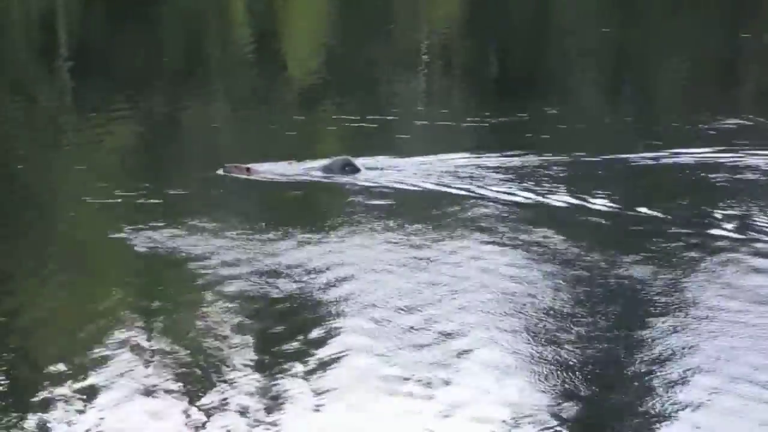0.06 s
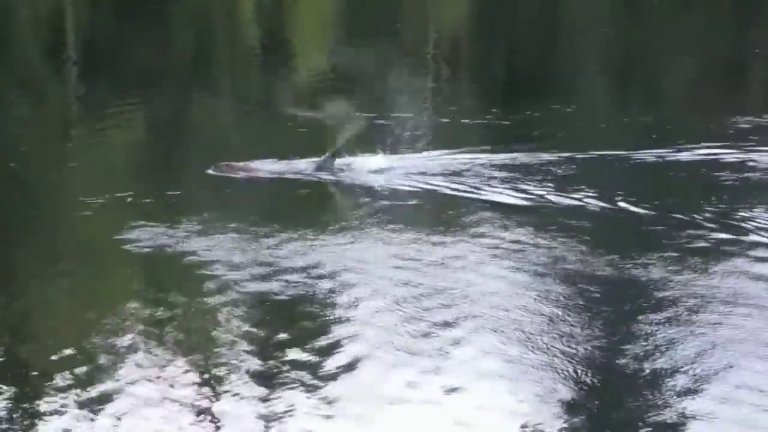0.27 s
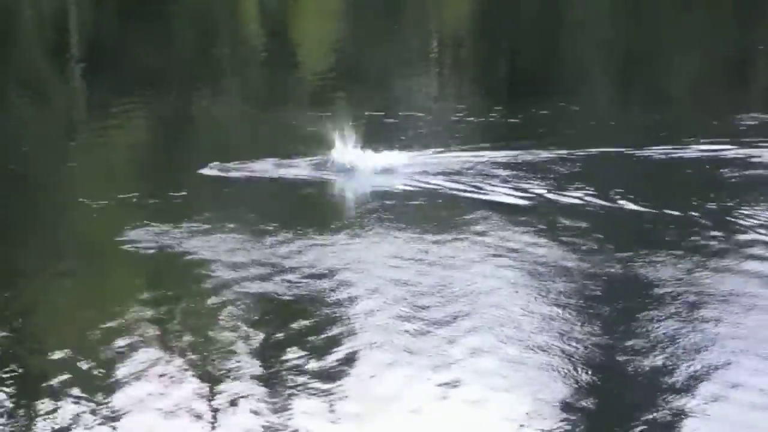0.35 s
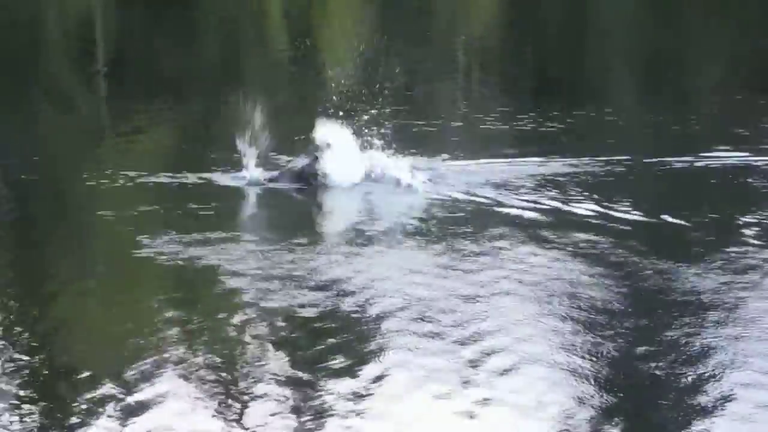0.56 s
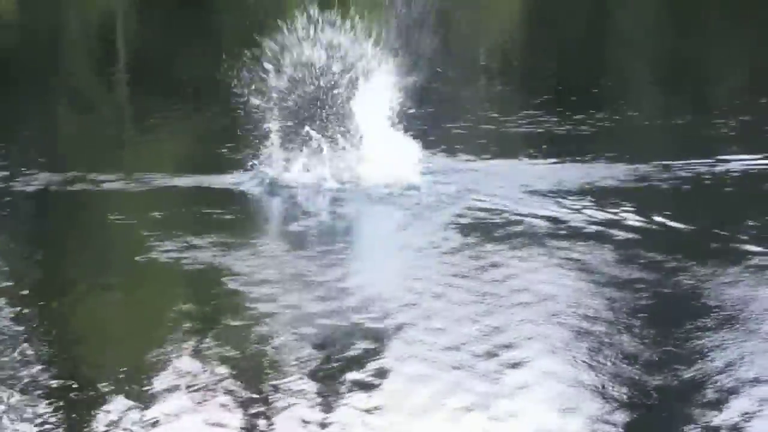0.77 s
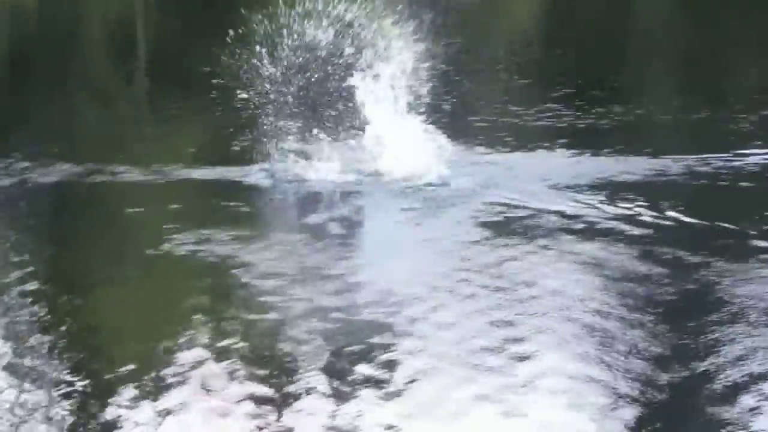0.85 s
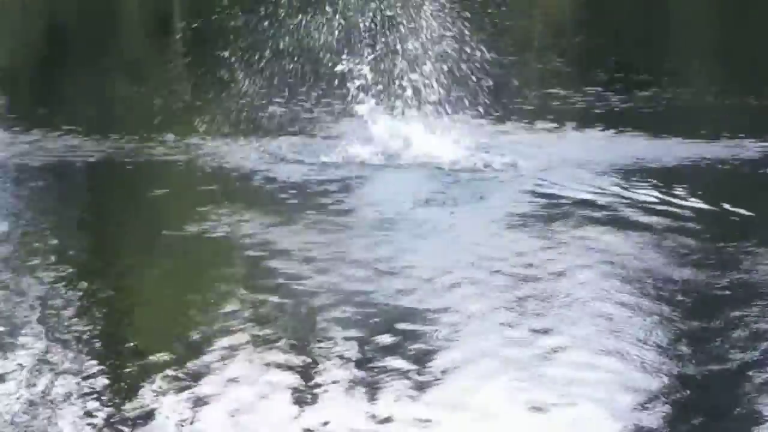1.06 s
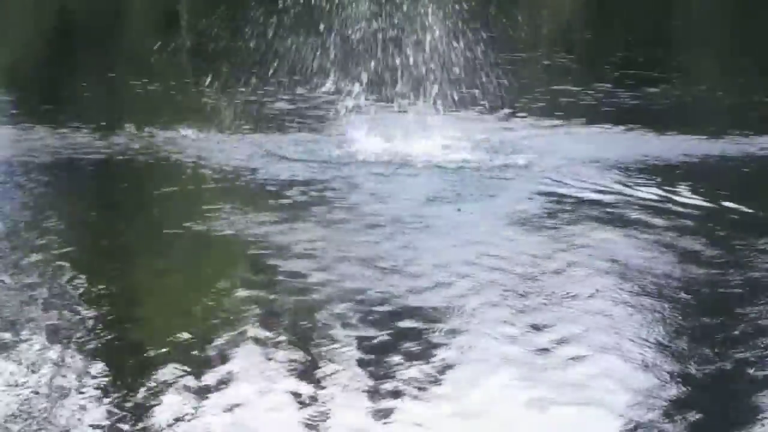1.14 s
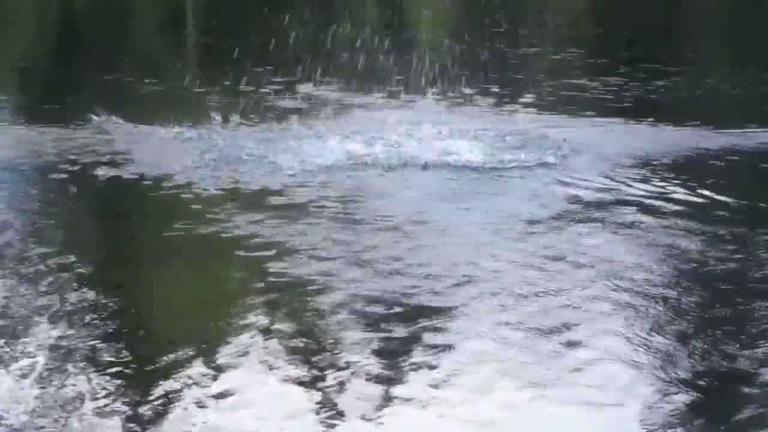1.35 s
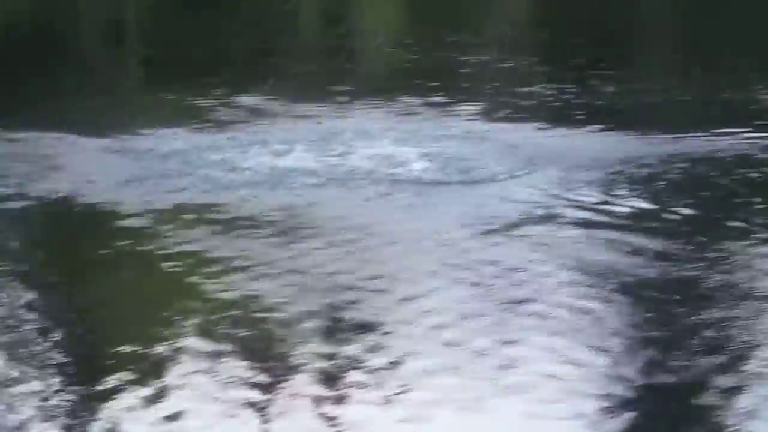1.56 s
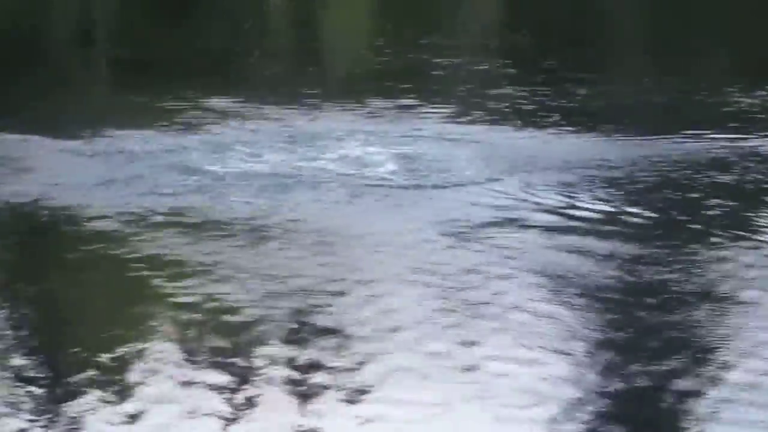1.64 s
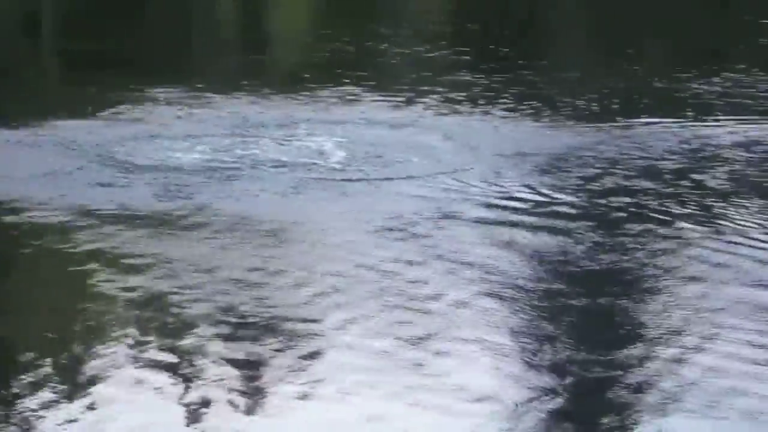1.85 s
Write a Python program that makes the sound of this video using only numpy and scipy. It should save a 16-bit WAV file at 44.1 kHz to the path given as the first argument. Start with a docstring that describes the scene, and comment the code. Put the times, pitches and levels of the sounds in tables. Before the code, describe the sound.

A beaver's tail slaps a pond. A small watery swish at 0.2 seconds leads to the sharp, loud crack and low thump at 0.4, with a faint echo from the bank. A deep plunk follows at 0.65 as spray bursts up and water gurgles. From about 1.1 to 1.6 seconds the spray patters back, thinning to single drips by 1.9. A faint distant rush continues throughout.

```python
"""A pond with a wooded bank, on a stereo microphone, with a steady rush in the distance.
A beaver lifts its tail out of the water with a swish, slaps it flat and dives; the bank answers faintly.
The slap ducks the gain. As it creeps back, the hollow in the water closes with a deep plunk.
A plume of spray goes up and patters back onto the pond, ending in single drips."""
import sys
import numpy as np
from scipy import signal
from scipy.fft import rfft, irfft, next_fast_len
from scipy.io import wavfile
from scipy.ndimage import uniform_filter1d, map_coordinates

SR = 44100
rng = np.random.default_rng(int(sys.argv[2]) if len(sys.argv) > 2 else 0)


def pcm_store(signal):
    """Save signal as 16-bit PCM."""
    levels = np.round(np.clip(np.atleast_2d(signal), -1, 1) * 32767)
    wavfile.write(sys.argv[1], SR, levels.astype(np.int16).T)


N = 83790

# spectrum of the distant rush (f/Hz, level/dB)
RUSH_COLOUR = [(25, -13), (45, -2), (115, 0), (310, -13), (820, -7), (1200, -12), (2000, -25),
               (3500, -37.5), (10000, -45.5)]
# stereo width of the rush and of the spray: gain of the side signal (f/Hz, level/dB)
RUSH_SIDE = [(700, -14.5), (1400, -6.5), (3000, 1)]
SPRAY_SIDE = [(300, -34), (2000, -15.5), (10000, -5.5)]
# finest droplets landing (t/s, level/dB) and their spectrum (f/Hz, level/dB)
MIST_LEVEL = [(1.1, -39.5), (1.62, -40), (1.9, -39.5)]
MIST_SPECTRUM = [(1200, -25), (4000, -3), (10000, 5.5), (14000, 8)]
# single drips (t/s, f/Hz, level/dB)
SINGLE_DRIPS = [(.458, 13800, -20), (1.6248, 4490, -19), (1.6643, 10000, -24.5), (1.6795, 7600, -25.5),
                (1.712, 4500, -28.5), (1.7773, 5800, -24), (1.8534, 7200, -20), (1.8598, 10200, -28)]
# single large bubbles, and last the ring that follows the drip at 1.6248 s (t/s, f/Hz, level/dB)
BUBBLE_RINGS = [(.136, 2140, -36), (.189, 378, -29.5), (.224, 494, -25), (.593, 1630, -18.5),
                (.752, 554, -28), (.976, 1030, -26), (1.012, 592, -27), (1.6265, 4900, -24.5)]
# churned water full of bubbles (t/s, level/dB)
CHURN_LEVEL = [(.16, -69), (.2, -42), (.245, -39), (.3, -42.5), (.53, -59), (.6, -36), (.7, -31),
               (.82, -39.5), (.95, -42.5), (1.0, -34), (1.06, -39), (1.9, -56)]
# lumps of water landing, each trapping a bubble (t/s, bubble f/Hz, level/dB)
WATER_LUMPS = [(.546, 3000, -28.5), (.558, 3970, -27), (1.2036, 1890, -24), (1.222, 2200, -24.5),
               (1.2625, 1580, -22), (1.331, 3680, -24), (1.358, 1890, -23), (1.393, 2000, -24.5),
               (1.434, 4200, -25), (1.498, 2810, -27), (1.52, 3240, -23), (1.544, 3900, -26.5)]
# the plume falling back (t/s, level/dB) and its spectrum (f/Hz, level/dB)
FALL_LEVEL = [(.95, -48.5), (1.1, -39), (1.22, -32.5), (1.3, -37), (1.39, -33.5), (1.54, -38.5),
              (1.78, -55.5)]
FALL_SPECTRUM = [(200, -22), (1300, -4.5), (2300, -1), (3300, -4.5), (4400, -1.5), (5500, -8),
                 (10500, -12.5)]
# sheets of water tearing into spray (t/s, level/dB) and their spectrum (f/Hz, level/dB)
SPRAY_LEVEL = [(.16, -58), (.225, -38.5), (.27, -39), (.35, -51.5), (.535, -43), (.55, -36), (.62, -34.5),
               (.72, -30.5), (.80, -36), (.89, -32.5), (.95, -36), (1.5, -36), (1.8, -57)]
SPRAY_SPECTRUM = [(200, -16.5), (700, -2), (2400, 3), (3300, -3), (4300, -0.5), (5500, -5.5), (10500, -9.5)]
# the collapsing hollow (t/s, f/Hz, level/dB)
HOLLOW = [(.642, 153, -40), (0.646, 136, -13), (.654, 62.3, -16), (.70, 60.2, -24), (.745, 66.6, -36),
          (.79, 94, -29.5), (0.811, 112, -37)]
# spectrum of the tail's low push (f/Hz, level/dB)
WHUMP_SPECTRUM = [(60, -11), (190, 1), (680, -.5), (1000, -13), (3000, -29)]
# water squirting from under the tail (t/s, level/dB) and its spectrum (f/Hz, level/dB)
SQUIRT_LEVEL = [(.378, -43), (.3802, -17.5), (.3862, -14.5), (.391, -26.5), (.41, -37.5), (.54, -54)]
SQUIRT_SPECTRUM = [(300, -9), (1200, -3.5), (2500, 5), (5000, -1.5), (10500, -4)]
# the tail meets the water: edge, then blade (t/s, level/dB relative to SLAP_DB)
TAIL_BLOWS = [(.382, -1), (.3834, 2)]
# spectrum of each blow (f/Hz, level/dB)
CRACK_SPECTRUM = [(1250, -19.5), (1750, 0.5), (2150, 2), (2900, 1), (3900, -5.5), (4800, -24), (10500, -25)]
# treble roll-off of the microphone (f/Hz, level/dB)
MIC_ROLLOFF = [(10800, 1), (12800, -8.5), (16000, -14)]
# left microphone port against right: balance (f/Hz, level/dB) and lead (f/Hz, phase/rad)
PORT_BALANCE = [(300, 0.5), (1200, -1), (2500, -5.5), (3400, -0.5), (4500, -3), (7000, -8.5), (10500, -8),
                (13000, 2)]
PORT_LEAD = [(1000, 0), (2200, -0.64), (3100, 0.93), (4100, -0.26), (9500, 0.9), (13000, 2.5)]

RUSH_DB, BANK_DB, BANK_T60_S = -39, -20, 0.29
BUBBLE_CYCLES, BUBBLE_RISE = 2.76, 0.032  # cycles to decay to 1/e; upward bend of the pitch
DRIP_RISE_S, DRIP_OCTAVES_PER_S, DRIP_CYCLES, DRIP_SPATTER = .00045, 550, 2.8, 0.29
FIZZ_S, FIZZ_DB, FIZZ_T60_S = .458, -42, .5
DROPS_PER_S, FALL_REFERENCE_DB = 2400, -31  # the fall would be this dense at this level
CLUMPS_PER_S, CLUMP_DB, DROP_SWEEP_S_PER_HZ = 110, 1.8, 1.2e-7
SLAP_DB, WHUMP_S, WHUMP_DB = 7.5, .3824, 8.5
REBOUND_S, REBOUND_DB = .0035, -5  # relative to the push
DUCK_OVER_DB, DUCK_SHARE, DUCK_ATTACK_S, DUCK_RELEASE_S = -16, 0.82, 0.016, 0.19
NOTCH_HZ, NOTCH_WIDTH_HZ, TOP_HZ = 8160, 680, 15900


def amp(db):
    """Decibels to gain."""
    return 10 ** (np.asarray(db) / 20)


def unit(x):
    """Scale to rms 1."""
    return x / np.sqrt(np.mean(x ** 2) + 1e-20)


def clock():
    """Time of every sample in seconds."""
    return np.arange(N) / SR


def along(points, hz):
    """Interpolate (f/Hz, value) rows on a log frequency axis."""
    f, v = np.transpose(points)
    return np.interp(np.log(hz + 1), np.log(f + 1), v)


def level(rows):
    """Gain per sample from (t/s, level/dB) rows, silent before the first."""
    s, db = np.transpose(rows)
    return amp(np.interp(clock(), s, db, left=-120))


def filtered(x, response):
    """x through a complex frequency response."""
    size = next_fast_len(N + SR // 2)
    return irfft(rfft(x, size) * response(np.fft.rfftfreq(size, 1 / SR)), size)[..., :N]


def coloured(x, points):
    """x through a minimum-phase filter of unit energy, shaped by (f/Hz, level/dB) rows."""
    size = 4096
    cepstrum = irfft(np.log(amp(along(points, np.fft.rfftfreq(size, 1 / SR)))))
    fold = np.r_[1, np.full(size // 2 - 1, 2), np.zeros(size // 2)]
    impulse = irfft(np.exp(rfft(cepstrum * fold)))
    return signal.fftconvolve(x, impulse / np.linalg.norm(impulse))[:N]


def spread(mid, side, width):
    """Left and right from mid and side signals."""
    side = filtered(side, lambda hz: amp(along(width, hz)))
    return np.array([mid + side, mid - side])


def burst(start, t60):
    """Envelope that jumps up at start and falls 60 dB in t60 seconds."""
    age = clock() - start
    return (age > 0) * amp(-60 * np.abs(age) / t60)


def ring(starts, pitches, gains, cycles=BUBBLE_CYCLES):
    """Ringing bubbles: damped sines with a soft start and a rising pitch."""
    t = np.arange(SR // 25) / SR
    turns = pitches[:, None] * t
    age = turns / cycles
    envelopes = gains[:, None] * 2 * np.exp(-age) * (1 - np.exp(-4 * age))
    waves = envelopes * np.sin(2 * np.pi * turns * (1 + BUBBLE_RISE * age))
    where = (starts * SR).astype(int)[:, None] + np.arange(len(t))
    return np.bincount(where.ravel(), waves.ravel(), N)[:N]


def bubbling(centre_hz, octaves, count, cycles=BUBBLE_CYCLES):
    """A cloud of bubbles scattered around one pitch, rms 1."""
    starts = rng.random(count) * N / SR
    pitches = np.clip(centre_hz * 2 ** (octaves * rng.standard_normal(count)), 150, 12000)
    sizes = amp(2.9 * np.clip(rng.standard_normal(count), -2, 2))
    return unit(ring(starts, pitches, sizes * np.sqrt(pitches), cycles))


def patter(per_s, spread_db, hiss):
    """Random droplet impacts of scattered size, each a tiny upward chirp, over a fine hiss; rms 1."""
    chance = np.clip(per_s / SR, 1e-4, 1)
    sizes = amp(spread_db * np.clip(rng.standard_normal(N), -2, 2)) * rng.choice([-1, 1], N)
    ticks = (rng.random(N) < chance) * sizes / np.sqrt(chance)
    chirps = filtered(ticks, lambda hz: np.exp(-1j * np.pi * DROP_SWEEP_S_PER_HZ * hz ** 2))
    return unit(unit(chirps) + hiss * rng.standard_normal(N))


def rush():
    """Far off, the steady rush and low rumble of the outdoors."""
    mid, side = [coloured(rng.standard_normal(N), RUSH_COLOUR) for _ in range(2)]
    return amp(RUSH_DB) * spread(mid, side, RUSH_SIDE)


def bank(x):
    """The wooded bank scatters a faint, diffuse answer back to the microphone."""
    t = np.arange(SR) / SR
    decay = rng.standard_normal((2, SR)) * amp(-60 * t / BANK_T60_S)
    return amp(BANK_DB) * signal.fftconvolve(x[None], decay / np.linalg.norm(decay[0]), axes=1)[:, :N]


def drips():
    """Stray drops chirp upward and ring briefly, among tiny ticks and the fizz of mist from the slap."""
    t, chirps, spatter = clock(), np.zeros(N), np.zeros(N)
    for s, hz, db in SINGLE_DRIPS:
        pitch = hz * 2 ** np.clip(DRIP_OCTAVES_PER_S * (t - s), -1, .3)
        from_peak = np.where(t < s, (s - t) / DRIP_RISE_S, (t - s) * hz / DRIP_CYCLES)
        envelope = amp(db) / np.cosh(np.minimum(from_peak, 20))
        chirps += envelope * np.sin(2 * np.pi * np.cumsum(pitch) / SR)
        spatter += DRIP_SPATTER * envelope
    ticks = level(MIST_LEVEL) * patter(200, spread_db=3, hiss=.3)
    fizz = amp(FIZZ_DB) * burst(FIZZ_S, FIZZ_T60_S)
    return chirps + coloured(ticks + (spatter + fizz) * rng.standard_normal(N), MIST_SPECTRUM)


def bubbles():
    """A few large bubbles ring out above the churn, and one drip rings on after its chirp."""
    s, hz, db = np.transpose(BUBBLE_RINGS)
    return ring(s, hz, amp(db))


def churn():
    """The stirred pond gurgles with trapped air."""
    return level(CHURN_LEVEL) * bubbling(786.4, octaves=0.657, count=1600)


def lumps():
    """Heavier lumps of water land one by one: a short splat and the pop of a bubble."""
    s, hz, db = np.transpose(WATER_LUMPS)
    envelope = sum(gain * burst(start, t60=.027) for start, gain in zip(s, amp(db)))
    splats = coloured(envelope * rng.standard_normal(N), FALL_SPECTRUM)
    return splats + ring(s, hz, amp(db + .5))


def fall():
    """The plume comes down in bunches of drops, denser when louder, that trap small bubbles."""
    envelope = level(FALL_LEVEL)
    drops = patter(DROPS_PER_S * envelope / amp(FALL_REFERENCE_DB), spread_db=5, hiss=0.11)
    knots = rng.standard_normal(N // 10)
    clumps = unit(amp(CLUMP_DB * map_coordinates(knots, [clock() * CLUMPS_PER_S])))
    trapped = amp(-10) * bubbling(2410, octaves=0.765, count=800, cycles=5)
    return coloured(envelope * clumps * drops, FALL_SPECTRUM) + envelope * trapped


def spray():
    """Sheets of water tear into fine droplets and small bubbles."""
    droplets = coloured(patter(5000, spread_db=5.5, hiss=0.48), SPRAY_SPECTRUM)
    trapped = amp(-7.5) * bubbling(2577, octaves=0.706, count=1500, cycles=3.8)
    return level(SPRAY_LEVEL) * (droplets + trapped)


def splash():
    """Water going up, coming down and churning, with fresh random drops on each call."""
    return spray() + fall() + churn() + lumps()


def plunk():
    """The big air pocket rings: its pitch drops quickly, then rises as it nears the surface."""
    s, hz, db = np.transpose(HOLLOW)
    t = clock()
    phase = 2 * np.pi * np.cumsum(np.interp(t, s, hz, left=0)) / SR
    return np.sqrt(2) * amp(np.interp(t, s, db, right=-120)) * np.sin(phase)


def whump():
    """The low push of the flat tail on the pond, and the pull as the water springs back."""
    push = np.zeros(N)
    push[round(WHUMP_S * SR)] = amp(WHUMP_DB)
    push[round((WHUMP_S + REBOUND_S) * SR)] -= amp(WHUMP_DB + REBOUND_DB)
    return coloured(push, WHUMP_SPECTRUM)


def slap():
    """Edge and blade of the tail hit with two hard cracks, inside a short squirt of water."""
    blows = np.zeros(N)
    for s, db in TAIL_BLOWS:
        blows[round(s * SR)] = amp(SLAP_DB + db)
    squirt = level(SQUIRT_LEVEL) * coloured(rng.standard_normal(N), SQUIRT_SPECTRUM)
    return coloured(blows, CRACK_SPECTRUM) + squirt


def scene():
    """The beaver is at one spot, centred; its splash is a little wider, with bank and rush behind."""
    water = slap() + whump() + plunk() + splash() + bubbles() + drips()
    return spread(water, splash(), SPRAY_SIDE) + bank(water) + rush()


def gain_control(x):
    """A loud peak turns the recorder's gain down; it creeps back."""
    power = np.abs(uniform_filter1d(np.mean(x ** 2, axis=0), size=SR // 200))
    over_db = np.maximum(10 * np.log10(power + 1e-12) - DUCK_OVER_DB, 0)
    fade = np.exp(-clock() / DUCK_RELEASE_S)
    held_db = np.maximum.accumulate(over_db / fade) * fade
    step = 1 / (DUCK_ATTACK_S * SR)
    return x * amp(-DUCK_SHARE * signal.lfilter([step], [1, step - 1], held_db))


def microphone(hz):
    """Response of two ports, unequal in level and phase, with a treble notch and roll-off."""
    notch = (hz - NOTCH_HZ) ** 2 / ((hz - NOTCH_HZ) ** 2 + NOTCH_WIDTH_HZ ** 2 / 2)
    sides = np.array([[.5], [-.5]])
    gain = amp(along(MIC_ROLLOFF, hz) + sides * along(PORT_BALANCE, hz))
    return notch * gain * np.exp(1j * sides * along(PORT_LEAD, hz))


def record(dry):
    """Microphone, gain control, overload near full scale and a band limit."""
    ducked = gain_control(filtered(dry, microphone))
    return filtered(np.clip(ducked, -.93, .93), lambda hz: hz < TOP_HZ)


dry = scene()
out = record(dry)
pcm_store(out)
```